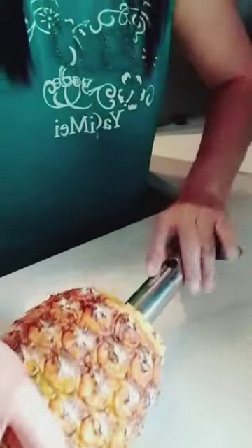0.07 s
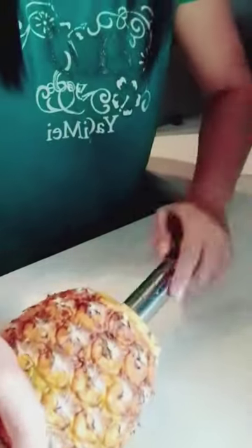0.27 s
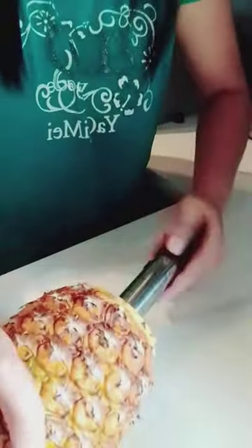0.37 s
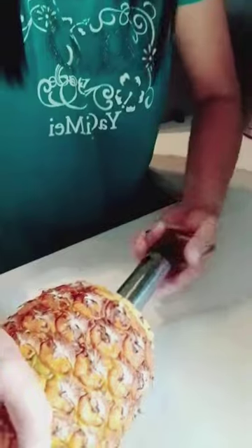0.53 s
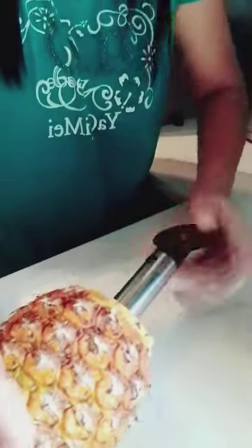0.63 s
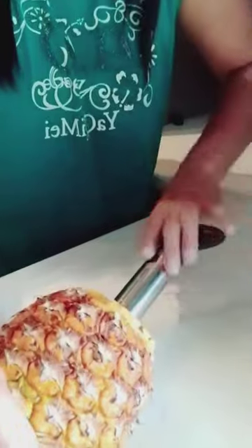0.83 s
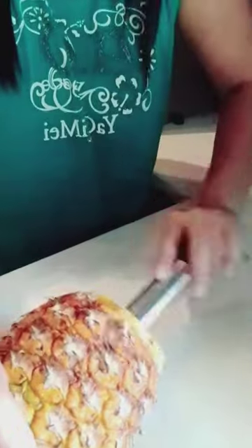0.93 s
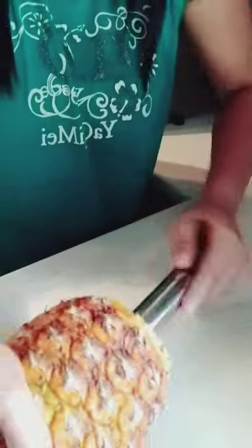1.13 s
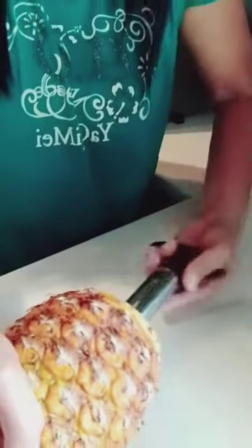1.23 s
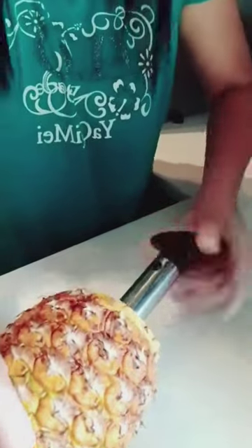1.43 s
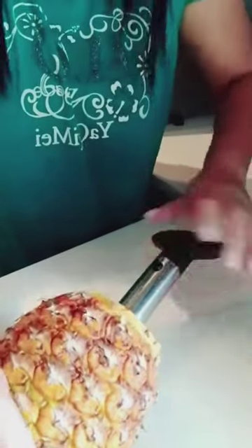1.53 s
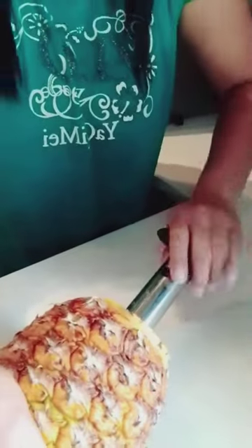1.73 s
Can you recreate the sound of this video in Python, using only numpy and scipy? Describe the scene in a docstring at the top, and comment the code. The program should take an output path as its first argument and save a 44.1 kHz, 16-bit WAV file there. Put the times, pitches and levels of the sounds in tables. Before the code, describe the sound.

A steel corer twists into a pineapple, close by in a small room. The handle clicks at about 0.2 seconds, then a wet crunch of snapping fibres runs from 0.3 to 0.6. Plastic clicks and light knocks follow near 0.7 and 1.0. A second crunch lasts from 1.2 to 1.4, with a softer click at 1.5. An appliance hums faintly throughout.

```python
"""A steel corer is twisted twice into a pineapple on a kitchen counter.
Each twist tears a dense run of wet fibres, tiny snaps with a few thick ones cracking on top.
Between twists the hand lets go of the plastic handle and grips it again with small clicks and
knocks, and the steel tube rings faintly. Pushes thump softly through the counter.
An appliance hums in the small, hard-walled room."""
import sys
import numpy as np
from scipy import signal
from scipy.fft import rfft, irfft, next_fast_len
from scipy.io import wavfile
from scipy.ndimage import uniform_filter1d, minimum_filter1d

SR = 44100
rng = np.random.default_rng(int(sys.argv[2]) if len(sys.argv) > 2 else 0)


def generate_wav(sig):
    """Save sig (samples, or channels by samples) to the path in sys.argv[1] as 16-bit PCM at SR."""
    pcm = np.round(np.clip(np.atleast_2d(sig).T, -1, 1) * 32767).astype(np.int16)
    wavfile.write(sys.argv[1], SR, pcm)


N = 79380
TIME = np.arange(N) / SR


def from_db(db):
    """Decibels to gain."""
    return 10 ** (np.asarray(db) / 20)


def unit_rms(x):
    """Scale to unit rms."""
    return x / np.sqrt(np.mean(x ** 2) + 1e-20)


def colour(x, points):
    """Minimum-phase EQ through (Hz, dB) points."""
    size = 2 * next_fast_len(N)
    hz, db = np.transpose(points)
    grid = np.maximum(np.arange(size // 2 + 1) * SR / size, 1)
    curve = from_db(np.interp(np.log(grid), np.log(hz), db))
    cepstrum = irfft(np.log(curve))
    cepstrum[1:size // 2] *= 2
    cepstrum[size // 2 + 1:] = 0
    return irfft(rfft(x, size) * np.exp(rfft(cepstrum)))[:N]


def band(x, low_hz, high_hz, order=2):
    """Butterworth band-pass."""
    sos = signal.butter(order, [low_hz, high_hz], "band", fs=SR, output="sos")
    return signal.sosfilt(sos, x + 1e-18)


def high_shelf(x, above_hz, db):
    """Lift or lower everything above a pitch."""
    top = signal.sosfiltfilt(signal.butter(2, above_hz, "high", fs=SR, output="sos"), x)
    return x + (from_db(db) - 1) * top


def narrow_noise(hz, width_hz):
    """A band of noise at unit rms."""
    return unit_rms(band(rng.standard_normal(N), hz - width_hz / 2, hz + width_hz / 2))


def ring(hz, t60):
    """A dying sine."""
    return np.sin(2 * np.pi * hz * TIME) * from_db(-60 * np.minimum(TIME / t60, 2))


def burst(decay_s):
    """A sudden puff of tiny contacts that dies away."""
    t = TIME[:SR // 10]
    return rng.standard_normal(len(t)) * np.exp(-t / decay_s)


def add(out, s, sound):
    """Mix a sound in at s seconds."""
    start = int(s * SR)
    out[start:start + len(sound)] += sound[:N - start]


# The appliance's steady tones. Each row: pitch in Hz, rms level in dB.
HUM_TONES = [(300.2, -51.5), (384.2, -59), (403.7, -62), (100, -90)]
# EQ of its airy drone. Each row: frequency in Hz, gain in dB.
DRONE_EQ = [(20, -69), (35, -14), (50, -13), (78, -8), (120, -12), (145, -11.5), (168, -48), (200, -11.5),
            (242, 6), (275, -3.5), (335, -3), (385, 6), (440, -15.5), (520, -9), (900, -55.5)]

def appliance():
    """An appliance hums: a few sines over a low, noisy drone."""
    hum = sum(from_db(db) * np.sqrt(2) * np.sin(2 * np.pi * (hz * TIME + rng.random()))
              for hz, db in HUM_TONES)
    drone = from_db(-58.5) * unit_rms(colour(rng.standard_normal(N), DRONE_EQ))
    return hum + drone


# EQ of the room air. Each row: frequency in Hz, gain in dB.
AIR_EQ = [(160, -37), (250, -21), (500, -6), (700, -4), (1000, 1), (1500, -5.5), (2600, -6), (4500, -15.5),
          (6000, -25), (7300, -28.5), (8100, -30.5), (10000, -31.5), (12800, -61), (15300, -29)]

def room_tone():
    """A soft bed of air with a thin, steady hiss on top."""
    air = from_db(-61.5) * unit_rms(colour(rng.standard_normal(N), AIR_EQ))
    hiss = from_db(-77) * narrow_noise(hz=8780, width_hz=310)
    return air + hiss


# EQ of the reverb tail. Each row: frequency in Hz, gain in dB.
REVERB_EQ = [(100, -2), (500, 4), (1500, 1), (3000, 2.5), (6000, 0), (9500, 7), (12500, -3), (15000, -7)]

def room(x, send_db=-10.5, low_t60_s=0.36, treble_t60_s=0.29, split_hz=2000, build_s=0.002):
    """Direct sound plus a diffuse tail that dulls as the walls soak up the treble sooner."""
    noise = rng.standard_normal(N)
    lows = signal.sosfiltfilt(signal.butter(2, split_hz, fs=SR, output="sos"), noise)
    tail = lows * from_db(-60 * TIME / low_t60_s) + (noise - lows) * from_db(-60 * TIME / treble_t60_s)
    tail *= 1 - np.exp(-TIME / build_s)
    response = from_db(send_db) * colour(tail / np.linalg.norm(tail), REVERB_EQ)
    return x + signal.fftconvolve(x, response)[:N]


# Pushes that shake the counter. Each row: start in seconds, level in dB.
PUSHES = [(0.221, -53.5), (0.406, -58.5), (1.27, -61.5)]

def counter():
    """The counter top answers each push with a low thump."""
    out = np.zeros(N)
    for s, db in PUSHES:
        add(out, s, from_db(db) * ring(hz=91.6, t60=0.14))
    return band(out, 50, 136)


# The steel tube's resonances. Each row: centre in Hz, width in Hz, gain in dB, t60 in seconds.
STEEL_MODES = [(2517, 160, 5, 0.22), (663, 180, 5, 0.19)]

def tube_ring():
    """Clusters of close, damped modes give the tube a rough ring."""
    return sum(from_db(db - 60 * np.minimum(TIME / t60, 2)) * narrow_noise(hz, width_hz)
               for hz, width_hz, db, t60 in STEEL_MODES)


# Fingers click and slip on the handle. Each row: start in seconds, decay in seconds,
# then body, middle, edge and tick levels in dB.
GRIP_CLICKS = [ (0.087, 0.0037, -59, -58, -58, -88), (0.2188, .0035, -33, -33, -41, -56),
               (0.2589, 0.0061, -47, -47, -49, -73), (0.2713, 0.0014, -47, -31, -36, -67),
               (0.276, 0.0069, -54, -41.5, -64, -67), (0.3005, .001, -65, -65, -50, -57),
               (0.3137, 0.0019, -51, -34.5, -50, -70), (0.7032, 0.001, -30, -31.5, -26, -52.5),
               (0.7269, 0.0028, -30.5, -36, -39, -68), (0.731, 0.0047, -43, -31, -36, -58),
               (0.9627, 0.001, -40, -32.5, -33.5, -58), (0.9922, 0.0059, -43.5, -35.5, -59, -77),
               (0.9948, 0.0026, -43, -39, -45, -54.5), (1.031, 0.026, -54, -53.5, -61, -76),
               (1.053, 0.0033, -43, -37.5, -39.5, -57.5), (1.146, 0.00079, -60, -52, -47, -64),
               (1.157, 0.013, -65, -49, -66, -78), (1.518, 0.0034, -41, -40.5, -50.5, -72),
               (1.54, 0.0073, -39, -40, -40, -63), ]
# Those four bands, body to tick. Each row: low edge in Hz, high edge in Hz.
GRIP_BANDS = [(420, 1100), (1250, 3700), (3000, 5180), (6500, 13600)]
# Knocks of handle, tube and fruit. Each row: start in seconds, level in dB, pitch in Hz, t60 in seconds.
HANDLING_KNOCKS = [(0.2193, -34, 326, 0.056), (0.2184, -28.5, 1413, 0.027), (0.2177, -30.5, 1707, 0.021),
                   (0.2205, -32, 3050, 0.0065), (0.2268, -22, 670, 0.0033), (0.3602, -24, 860, 0.018),
                   (0.3840, -19, 964, 0.018), (0.314, -30.5, 1100, .015), (0.7013, -27, 615, 0.005),
                   (0.7019, -33, 1880, .012), (0.962, -29, 2735, 0.021), (0.9731, -17, 914, 0.0097),
                   (0.9725, -23.5, 540, 0.009), (0.9729, -24.5, 2300, 0.0043), (0.9955, -32, 3920, 0.017),
                   (1.2179, -27, 3600, 0.017), (1.5415, -41.5, 540, 0.054)]
# The tube rings faintly when let go. Each row: start in seconds, gain in dB.
RELEASES = [(0.7035, -49), (0.732, -48.5), (1.518, -56.5)]
# Treble EQ over all the handling. Each row: frequency in Hz, gain in dB.
HANDLING_EQ = [(6000, -0.5), (8000, 2), (10000, 2), (12500, -8.5), (15000, 2)]

def handling():
    """The hand grips and lets go: plastic clicks, short pitched knocks and the ring of the tube."""
    out = np.zeros(N)
    for s, decay_s, *levels in GRIP_CLICKS:
        for (low_hz, high_hz), db in zip(GRIP_BANDS, levels):
            click = band(burst(decay_s), low_hz, high_hz, order=3)
            click *= np.sqrt(decay_s * SR / 2 / np.sum(click ** 2))   # starts near unit rms
            add(out, s, from_db(db) * click)
    for s, db, hz, t60 in HANDLING_KNOCKS:
        add(out, s, from_db(db) * band(ring(hz, t60), hz * 0.5, hz * 2.2))
    for s, db in RELEASES:
        add(out, s, from_db(db) * tube_ring())
    return colour(out, HANDLING_EQ)


# Tone of the tearing flesh. Each row: frequency in Hz, relative gain in dB.
FLESH_EQ = [(30, -38), (70, -20), (165, -23.5), (280, -3.5), (550, -7.5), (1100, 1.5), (1900, 3),
            (2350, -1), (2800, 2), (3150, -3), (3550, 2), (4050, -5.5), (4400, -4), (5200, -15.5),
            (6400, -17), (7800, -30.5), (9700, -26), (12500, -37), (15300, -31)]

def flesh(x, delays_s=(0.00026, 0.00041), scatter=0.55):
    """The fruit and tube smear and colour every snap: two all-passes, then an EQ of unit energy."""
    for s in delays_s:
        taps = np.r_[1, np.zeros(int(s * SR)), scatter]
        x = signal.lfilter(taps[::-1], taps, x + 1e-18)
    return colour(x, FLESH_EQ) / np.linalg.norm(colour(signal.unit_impulse(N), FLESH_EQ))


JUICE_HZ = 5300   # juice fizzes above this pitch
# Thick fibres breaking. Each row: start in seconds, level in dB, fizz shelf in dB.
THICK_FIBRES = [(0.3345, -34, -2), (0.3438, -27, -23), (0.347, -21.5, -15), (0.3595, -25, 6.5),
                (0.3818, -13, -38), (0.384, -24, -2), (0.4129, -25.5, -6), (0.427, -28.5, -7),
                (0.450, -39, 3), (0.4855, -26.5, -5), (0.526, -34, -18), (0.5739, -25.5, -7),
                (0.6005, -36.5, -3), (1.184, -24, -7), (1.2045, -31, -9), (1.218, -25.5, -21),
                (1.2675, -24, 4), (1.2885, -32.5, 16.5), (1.2933, -21, 7), (1.3135, -24.5, -15),
                (1.326, -15, 2.5), (1.3446, -29, -3), (1.357, -30, 0)]

def cracks(decay_s=0.00097):
    """Each thick fibre gives way in a quick volley, heard as one crack."""
    out = np.zeros(N)
    for s, db, fizz_db in THICK_FIBRES:
        volley = burst(decay_s)
        mids = band(volley, 500, 4500)
        volley *= np.sqrt(decay_s * SR / 10 / np.sum(mids ** 2))   # levelled by its midrange
        add(out, s, from_db(db) * high_shelf(volley, JUICE_HZ, fizz_db))
    return flesh(out)


def fibre_snaps(per_s=1350, spread_db=2.5, t60_cycles=5.2, pitched_db=-1.5):
    """Fibres snap at random, each a click of its own size with a few cycles of pitched ring."""
    sizes = from_db(spread_db * np.minimum(rng.exponential(1, N), 4)) * rng.choice([-1, 1], N)
    clicks = sizes * (rng.random(N) < per_s / SR)
    pitches_hz = np.linspace(600, 5400, 10)
    pitch_index = rng.integers(0, len(pitches_hz), N)
    pitched = np.zeros(N)
    for k, hz in enumerate(pitches_hz):
        rings = signal.fftconvolve(clicks * (pitch_index == k), ring(hz, t60_cycles / hz))[:N]
        pitched += rings * np.sqrt(hz)   # short, high rings carry as much energy as low ones
    return unit_rms(clicks) + from_db(pitched_db) * unit_rms(pitched)


# How hard the blade cuts, one envelope per twist. Each row: time in seconds, level in dB.
TWIST_ENVELOPES = [
    [(0.325, -61), (0.352, -39), (0.39, -32.5), (0.45, -33.5), (0.505, -32), (0.527, -38), (0.542, -51.5),
     (0.556, -36), (0.578, -37.5), (0.595, -50), (0.62, -71)],
    [(1.18, -63), (1.187, -37.5), (1.2, -43.5), (1.216, -31), (1.265, -32), (1.305, -35.5), (1.328, -34.5),
     (1.35, -40.5), (1.368, -83)],
]
# The fizz shelf halfway through each twist, in dB.
TWIST_FIZZ_DB = [2, 5.5]

def twist(envelope, fizz_db, rasp_hz=2800, juice_rise_db=6.5):
    """The turning blade tears a run of wet fibres into one dense crunch."""
    times, levels_db = np.transpose(envelope)
    progress = np.interp(TIME, [times[0], times[-1]], [0, 1])
    crunch = flesh(fibre_snaps())
    rasp_db = np.interp(progress, [0, 1], [5.5, -3.5])   # the crunch dulls as the wrist slows
    crunch = high_shelf(crunch, rasp_hz, rasp_db)
    juice_db = fizz_db + juice_rise_db * (progress - 0.5)   # juice gathers over the twist
    crunch = high_shelf(crunch, JUICE_HZ, juice_db)
    crunch /= np.sqrt(uniform_filter1d(crunch ** 2, size=900) + 1e-12)   # even out over about 20 ms
    return crunch * from_db(np.interp(TIME, times, levels_db, left=-np.inf, right=-np.inf))


def scene():
    """Two twists and the handling around them, in the room, over a steady bed."""
    bed = appliance() + room_tone()
    cutting = sum(twist(envelope, fizz_db) for envelope, fizz_db in zip(TWIST_ENVELOPES, TWIST_FIZZ_DB))
    return (room(cutting + cracks() + handling()) + counter() + bed)[None]


CEILING, LIMITER_S, CUTOFF_HZ = 0.13, 0.0015, 15550

def record(dry):
    """A fast limiter holds the peaks; a steep low-pass trims the top."""
    span = int(LIMITER_S * SR)
    gain = np.minimum(1, CEILING / (np.abs(dry) + 1e-9))
    gain = uniform_filter1d(minimum_filter1d(gain, size=span), size=span)
    return signal.sosfilt(signal.ellip(10, .1, 70, CUTOFF_HZ, fs=SR, output="sos"), dry * gain)


dry = scene()
out = record(dry)
generate_wav(out)
```